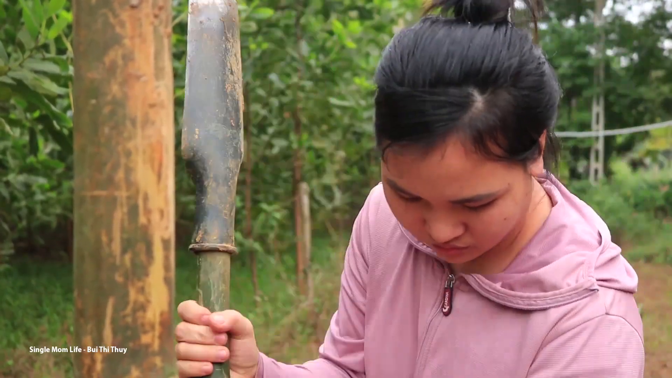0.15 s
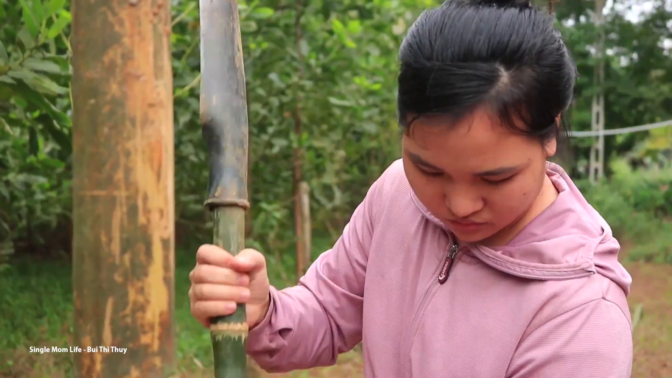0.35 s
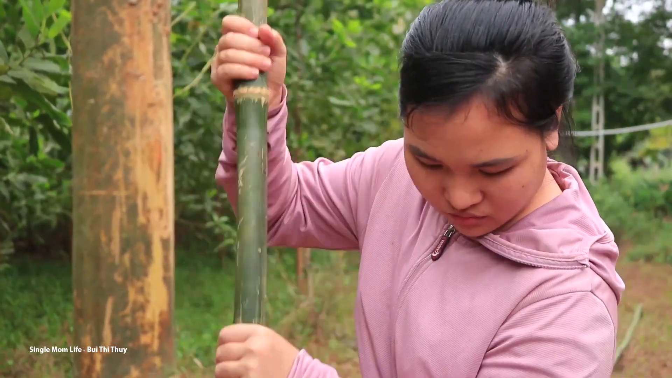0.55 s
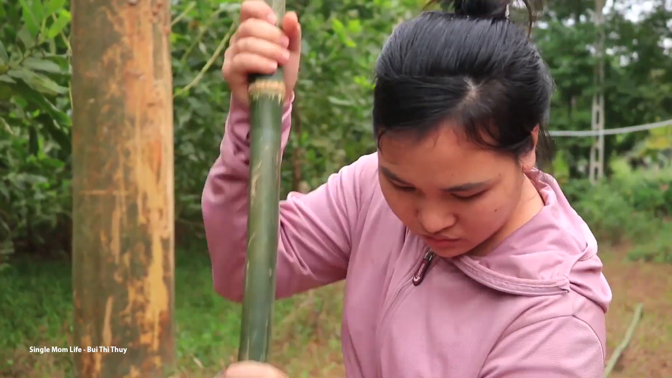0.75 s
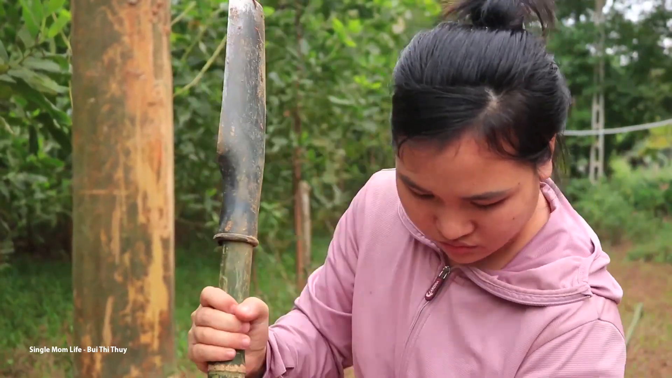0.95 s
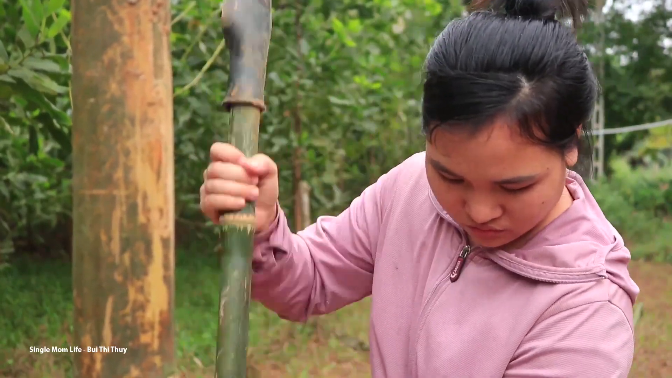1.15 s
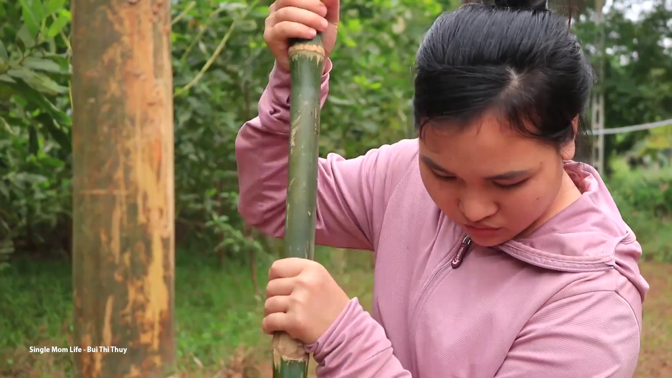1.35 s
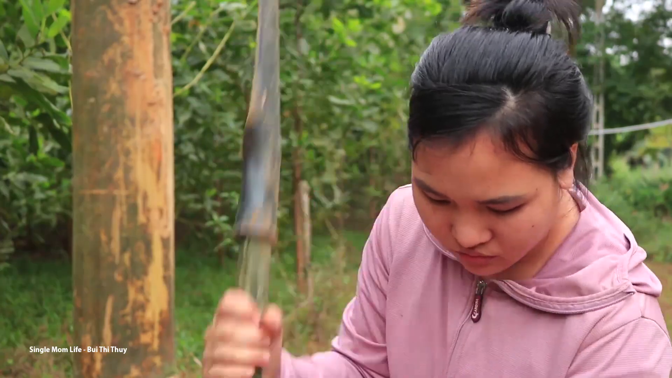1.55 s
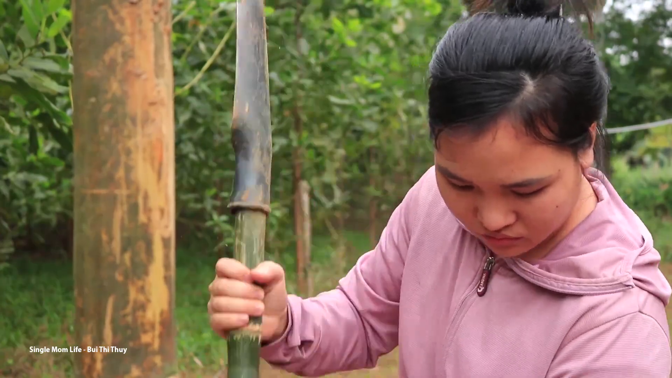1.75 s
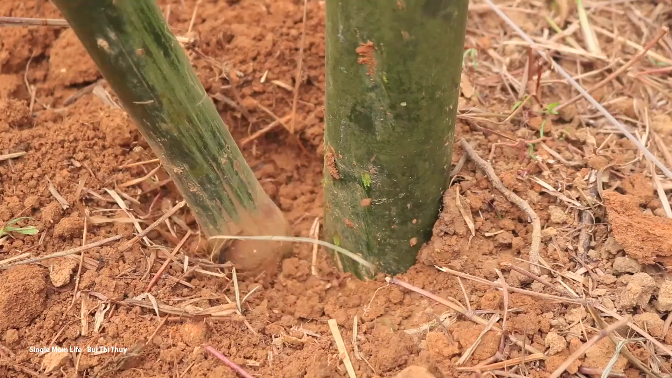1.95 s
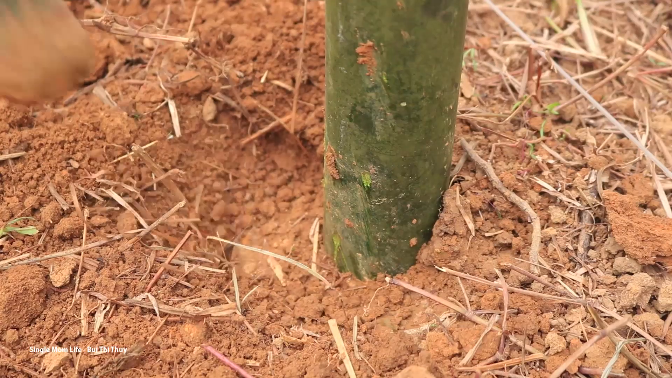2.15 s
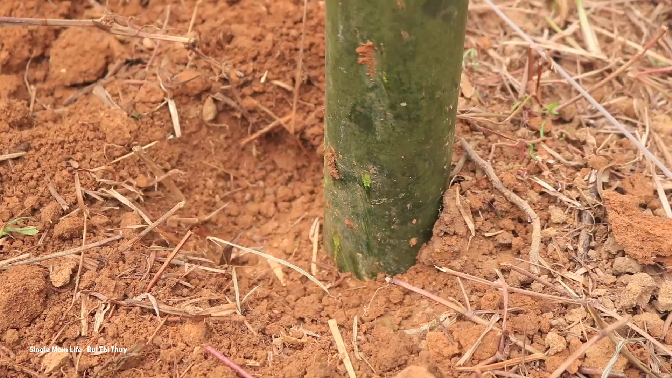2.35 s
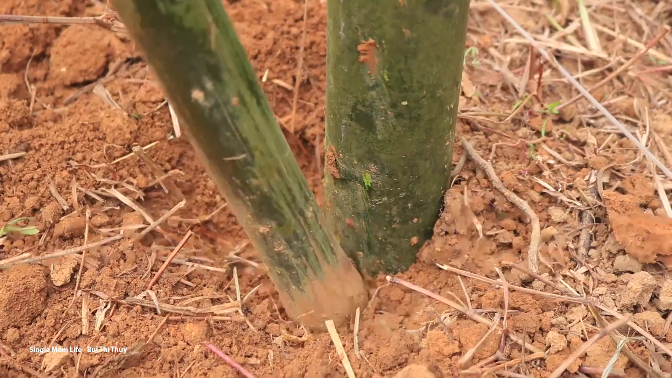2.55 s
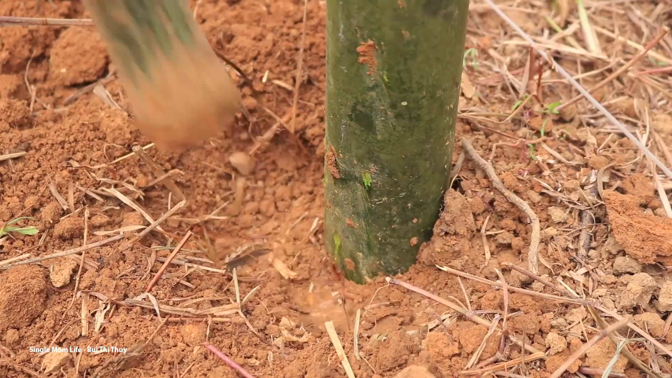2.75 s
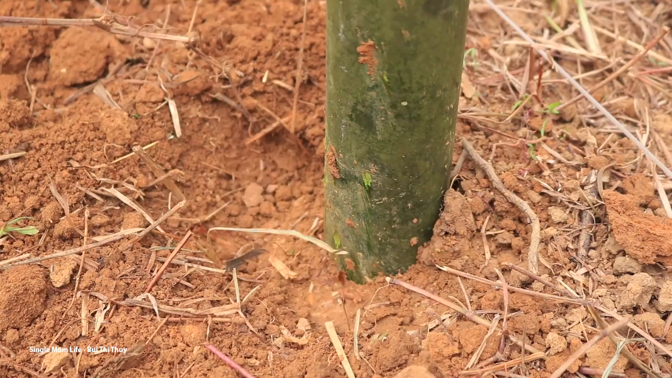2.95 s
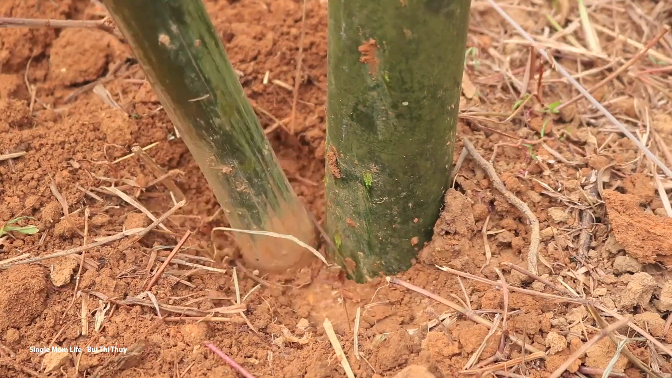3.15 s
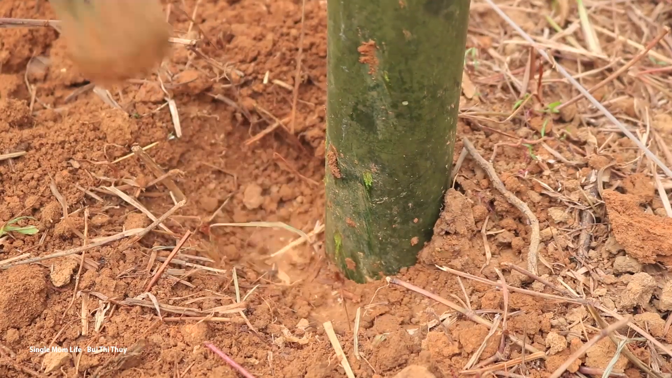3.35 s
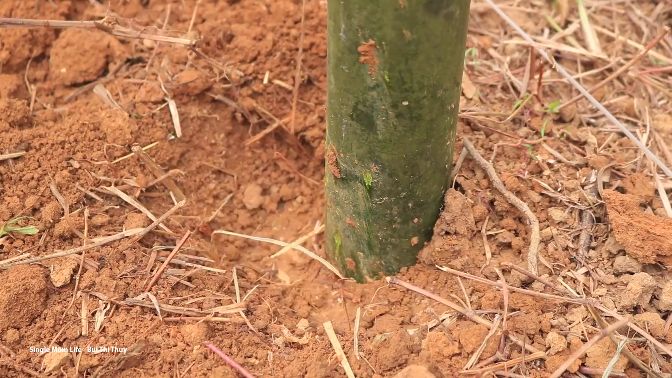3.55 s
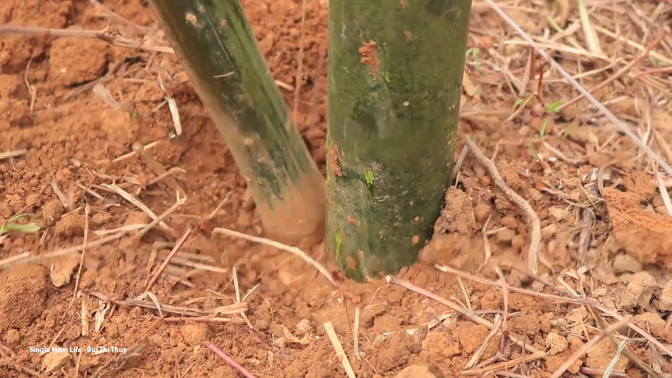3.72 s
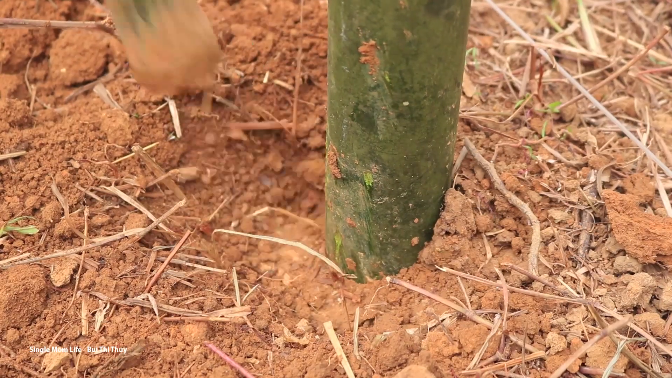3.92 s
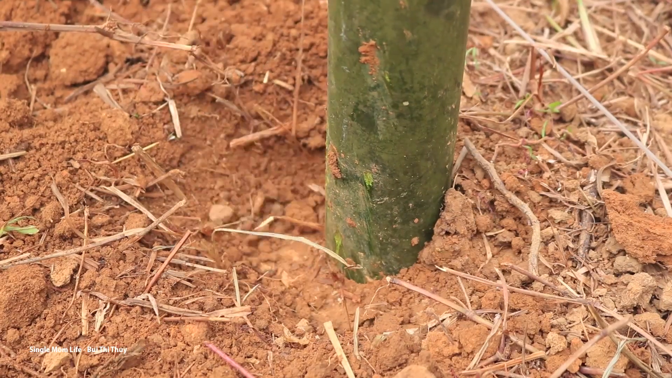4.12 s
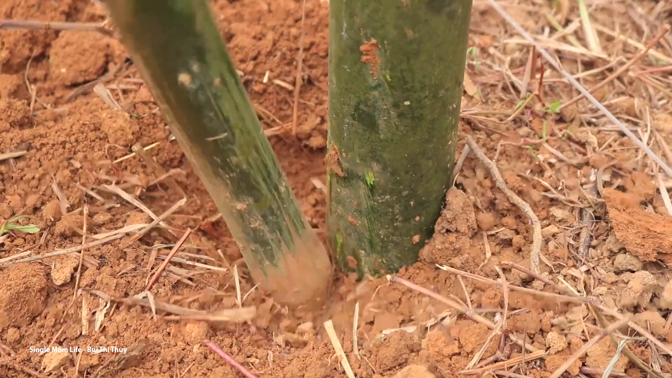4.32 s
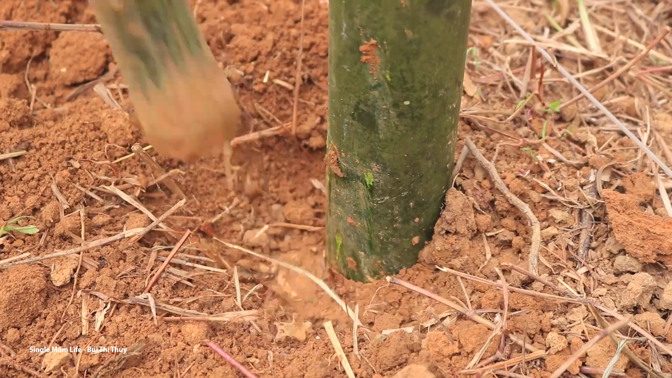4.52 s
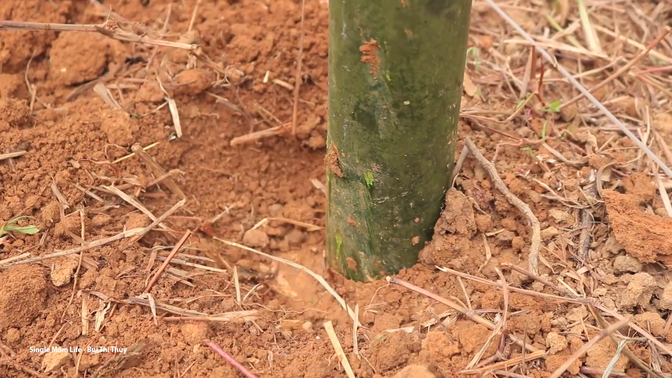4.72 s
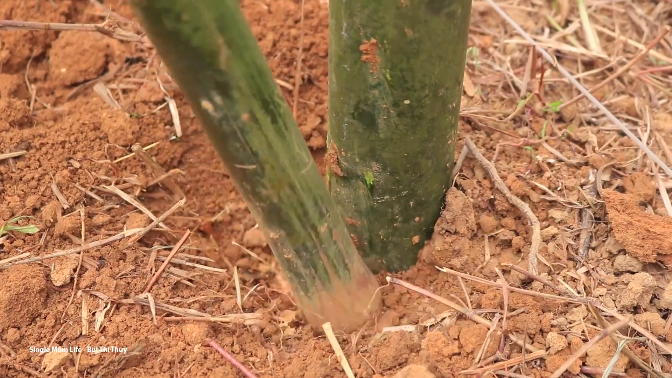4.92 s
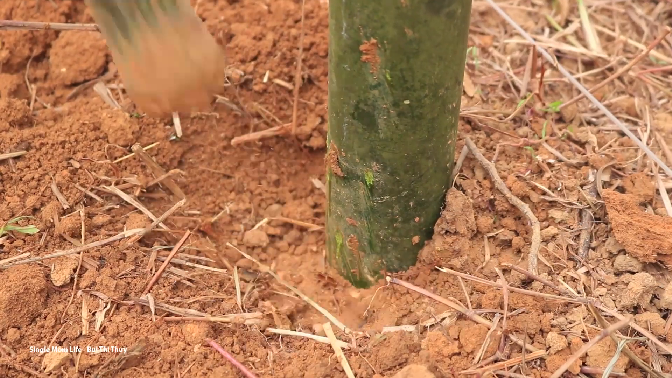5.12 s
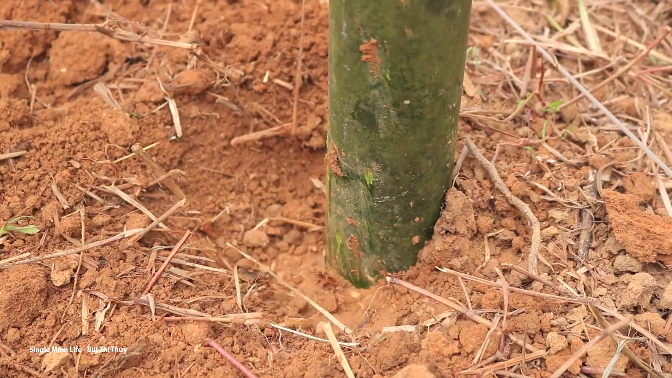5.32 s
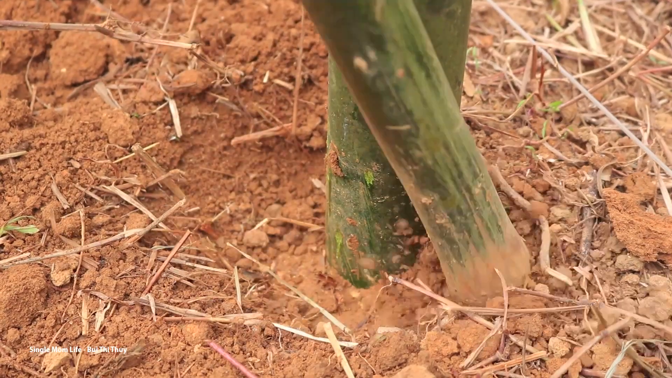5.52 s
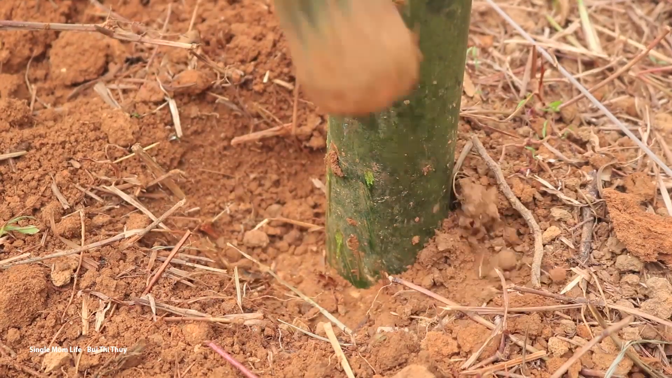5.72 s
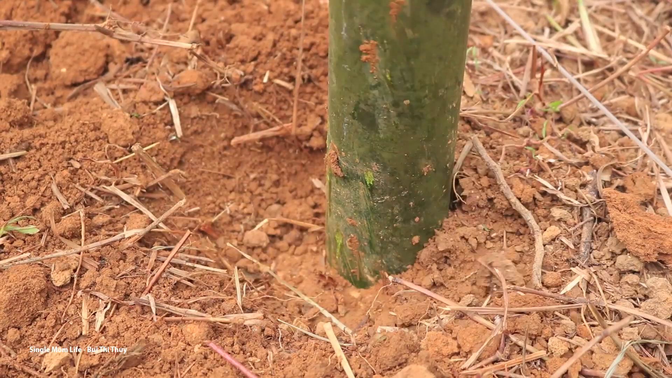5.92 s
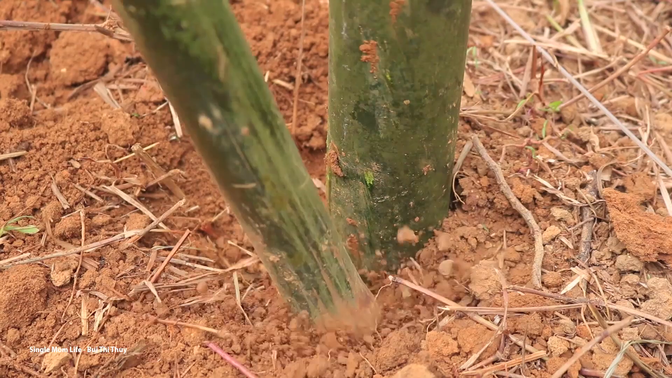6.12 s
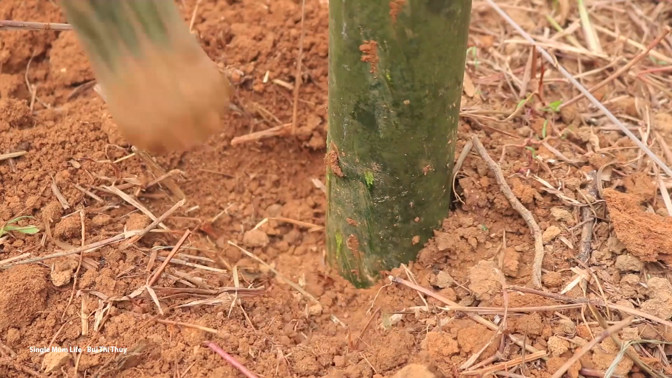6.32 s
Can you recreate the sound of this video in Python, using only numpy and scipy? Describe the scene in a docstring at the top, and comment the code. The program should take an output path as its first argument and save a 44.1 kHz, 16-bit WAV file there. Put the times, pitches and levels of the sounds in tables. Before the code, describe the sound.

Eleven crunchy knocks of a bamboo pole tamping dry earth, roughly every six tenths of a second, with light scuffs between in a quiet orchard.

```python
"""A quiet orchard: soft rustle and thin hiss first, then a green bamboo pole rams soil round a post.
Eleven blows land close to the microphone. In each, the end grazes loose crumbs, then cracks through them;
packed earth stops it with a sinking thump, and the pole judders, sways, buzzes and faintly rings.
Between blows it knocks lightly and scuffs loose soil. The hiss rises just before two seconds and stays.
Noise grains pass through the tube's resonances; the hardest blows overload the recorder."""
import sys
import numpy as np
from scipy import signal
from scipy.fft import rfft, irfft, next_fast_len
from scipy.io import wavfile

SR = 44100
rng = np.random.default_rng(int(sys.argv[2]) if len(sys.argv) > 2 else 0)


def log_audio(samples):
    """Write samples as a 16-bit WAV file to the path given in sys.argv[1]."""
    # one column per channel
    frames = np.atleast_2d(samples).T
    # limit to full scale, then quantise
    limited = np.clip(frames, -1, 1)
    pcm = np.round(limited * 32767).astype(np.int16)
    wavfile.write(sys.argv[1], SR, pcm)


N = 280917  # length in samples
AGE = np.arange(SR // 4) / SR  # seconds since a contact began
RING_AGE = np.arange(SR) / SR  # seconds, for the longer ringing and echoes

# The pole rams the soil. Each row: start in seconds, crushing time in seconds, delay until packed earth
# stops it in seconds, favoured pitch in Hz, then relative levels of crack, grit, graze and thump in dB,
# wall resonance in Hz, relative wall ring in dB.
BLOWS = [(0.241, 0.0079, 0.0094, 1320, -14.5, -25.5, -76, -12.5, 2800, -31),
         (0.946, 0.0023, .004, 2230, -25.5, -35, -55, -18.5, 2060, -44),
         (1.657, 0.0041, .013, 970, -13, -29, -57, -16, 2300, -39.5),
         (1.988, 0.0022, 0.0054, 2180, -24.5, -24.5, -27.5, -7.5, 2000, -42),
         (2.621, 0.0058, 0.00043, 1950, -17.5, -23, -46, -2.5, 2080, -32),
         (3.2041, 0.0021, 0.0015, 456, -14.5, -24, -36, -3.5, 1950, -35),
         (3.79, 0.0073, 0.0061, 1360, -16, -22, -25, -3.5, 2550, -34.5),
         (4.373, .015, .0124, 724, -15.5, -23.5, -33, -3.5, 616, -30),
         (4.971, 0.0079, 0, 464, -18, -33, -12, -4, 2710, -30),
         (5.573, 0.0041, 0.0004, 1420, -17.5, -24.5, -21.5, -6.5, 2060, -38),
         (6.172, 0.003, 0, 3070, -24, -12.5, -17, -10.5, 2150, -37)]
# Broad resonances of the hollow pole. Each row: pitch in Hz, width in Hz, lift in dB.
HOLLOW = [(257, 83, 11.5), (491, 310, 10), (796, 13, 4.5), (992, 170, 5.5), (1321, 110, 5.5), (1580, 27, 8),
          (1876, 80, 7.5), (2134, 64, 5.5), (2860, 220, 3.5), (3320, 270, 1.5), (5400, 890, 0),
          (8200, 4500, 3)]
# Bending modes of the whole pole. Each row: pitch in Hz, relative level in dB, t60 in seconds.
BENDING = [(69.1, -4, 0.79), (141.3, -17, 0.97), (177.7, 9.5, 0.1), (205, -7.5, 0.42)]
# Long-ringing modes of the pole's wall. Each row: pitch in Hz, relative level in dB, t60 in seconds.
WALL = [(702, -15.5, 1), (875, -25, 0.21), (1275, -10, 0.96), (1580, -28, 0.28), (2216, -5.5, 0.38),
        (2335, -0.5, 0.16), (2697, -11, 0.37), (3120, -5, 0.14), (3400, -1, .22)]
# Light knocks of the pole. Each row: start in seconds, favoured pitch in Hz, relative level in dB.
KNOCKS = [(0.380, 733, -43.5), (1.794, 896, -41.5), (1.951, 420, -51.5), (2.027, 315, -31.5),
          (2.936, 362, -57.5), (3.893, 889, -30.5), (5.061, 517, -42), (6.206, 341, -37.5)]
# The pole brushes loose soil and straw. Each row: start in seconds, length in seconds,
# favoured pitch in Hz, relative level in dB, relative grit level in dB.
SCUFFS = [(0.549, 0.083, 1190, -55, -62), (1.934, 0.034, 2770, -57.5, -53), (2.218, .004, 1630, -52, -45),
          (2.316, 0.028, 3330, -56.5, -66), (2.579, 0.019, 2150, -47.5, -46),
          (3.679, .012, 2660, -53.5, -74), (4.579, 0.015, 1620, -52.5, -58),
          (5.005, 0.003, 2700, -39, -28.5), (5.223, 0.0083, 2150, -59.5, -58),
          (5.533, 0.013, 3630, -36.5, -25.5), (5.553, 0.0033, 3020, -28.5, -16),
          (5.673, 0.025, 2470, -55, -55), (5.74, 0.015, 3470, -46.5, -33), (6.251, 0.0034, 2230, -54, -49),
          (6.279, 0.013, 1580, -51.5, -66)]
# Borders of the four bands of a contact, body, wood, crack and grit, in Hz.
BAND_EDGES_HZ = [230, 700, 1500, 4000, 15500]
# Spectrum of the orchard's still air. Each row: frequency in Hz, relative level in dB.
AIR = [(18, -54), (30, -11), (64, -3), (121, -2.5), (184, -6), (295, -7.5), (328, -9), (404, -9.5),
       (632, -10.5), (1220, -14.5), (1320, -12), (1540, -14), (4530, -20.5), (9710, -26.5), (16000, -37)]
# High hiss of the air. Each row: time in seconds, level in dB.
HISS = [(0, -70), (1.85, -67), (1.95, -59.5), (6.37, -60)]
# Likeness of the air at the two capsules. Each row: frequency in Hz, likeness (below zero counts as none).
AIR_LIKENESS = [(60, 0.89), (180, 0.74), (550, 0.32), (1650, 0.02), (4970, -0.78), (15000, -0.065)]
# Balance of the capsules on the pole. Each row: frequency in Hz, left minus right in dB.
CAPSULE_BALANCE = [(60, -3), (180, -2), (600, -1.5), (1400, -0.5), (2600, -2.5), (5500, -1.5), (11000, 1.3)]

# Balance of each kind of contact: body, wood and crack in dB.
BLOW_COLOUR_DB, KNOCK_COLOUR_DB, SCUFF_COLOUR_DB = [1, -4, 0], [0, -3, -6.5], [1.5, -4, -3.5]
FAVOUR_DB, FAVOUR_OCTAVES = 11, 0.73  # lift of a contact round its favoured pitch, and its reach
LIFT_AFTER_S, LIFT_S = 0.183, 0.021  # the pole is pulled free this long after a blow, for this long
AIR_DB = -48.5  # rms level of the rustle
CUTOFF_HZ = 15800


def blows(release_s=0.0051, graze_s=0.0034, level_db=-1.5, width_hz=110, lift_db=3,
          wall_width_hz=520, wall_lift_db=5):
    """The end grazes the loose top, then crushes it for a few milliseconds; the struck wall colours the crack."""
    out = np.zeros(N)
    graze_force = AGE / graze_s * (AGE < graze_s)
    graze_colour_db = np.array([-9, -2.5, 3, -2])
    for s, crush_s, _, hz, blow_db, grit_db, graze_db, _, wall_hz, _ in BLOWS:
        force = np.exp(-np.maximum(AGE - crush_s, 0) / release_s)
        colour_db = colour(BLOW_COLOUR_DB, hz, blow_db, grit_db)
        favoured = [(hz, width_hz, lift_db), (wall_hz, wall_width_hz, wall_lift_db)]
        crack = crunch(force, colour_db, grain_db=3.5, favoured=favoured, click=0.29)
        graze = crunch(graze_force, graze_db + graze_colour_db, grain_db=12.0)
        add(out, s, from_db(level_db) * crack)
        add(out, s - graze_s, graze)
    return out


def crunch(force, levels_db, grain_db, favoured=(), click=0, dull_hz=5000):
    """Crumbs break under a force and sound through the tube; each point of contact favours its own resonance."""
    # a few grains burst far above the rest
    burst_db = grain_db * np.minimum(rng.exponential(1, len(AGE)), 6)
    grains = rms_one(rng.standard_normal(len(AGE)) * from_db(burst_db))
    push = grains * force
    push[0] += click * np.sqrt(np.sum(force ** 2))  # the hard first touch
    dulled = signal.lfilter(*signal.butter(1, dull_hz, fs=SR), push + 1e-18)
    tube = hollow(dulled, [*HOLLOW, *favoured])
    contact = np.zeros(len(AGE))
    bands = zip(levels_db, BAND_EDGES_HZ, BAND_EDGES_HZ[1:])
    for k, (db, low_hz, high_hz) in enumerate(bands):
        part = from_db(db) * rms_one(band(tube, low_hz, high_hz))
        contact += part * (-1) ** k  # neighbouring bands have opposite polarity
    return contact * np.sqrt(np.mean(force ** 2))


def hollow(x, resonances):
    """The tube lifts whatever excites it at its resonances."""
    for hz, width_hz, lift_db in resonances:
        peak = signal.lfilter(*signal.iirpeak(hz, hz / width_hz, fs=SR), x)
        x = x + (from_db(lift_db) - 1) * peak
    return x


def colour(balance_db, hz, level_db, grit_db):
    """Levels of body, wood, crack and grit: the place of contact lifts the bands near its favoured pitch."""
    centres_hz = np.sqrt(np.multiply(BAND_EDGES_HZ[:-2], BAND_EDGES_HZ[1:-1]))
    nearness = np.exp(-(np.log2(centres_hz / hz) / FAVOUR_OCTAVES) ** 2 / 2)
    return [*(level_db + np.array(balance_db) + FAVOUR_DB * nearness), grit_db]


def aftermath(low_cut_hz=32, usual_crush_s=0.007, judder_db=-10.0, judder_follows=1.65,
              sway_db=-21.0, sway_follows=0.97, buzz_db=-39, buzz_follows=0.32):
    """A heavier thump brings more judder and sway; a longer crush feeds the fibres' buzz; the wall rings on."""
    out = np.zeros(N)
    for s, crush_s, stop_s, *_, thump_db, wall_hz, ring_db in BLOWS:
        push_db = 20 * np.log10(crush_s / usual_crush_s)
        stopped = s + stop_s
        sway = ringing(BENDING, scatter_db=3.0) + ground_rumble()
        # each "follows" is in dB per dB of thump or push
        add(out, stopped, from_db(thump_db) * thump())
        add(out, stopped, from_db(judder_db + judder_follows * thump_db) * judder())
        add(out, stopped, from_db(sway_db + sway_follows * thump_db) * sway)
        add(out, stopped, from_db(buzz_db + buzz_follows * push_db) * buzz())
        add(out, stopped, from_db(ring_db) * wall_ring(wall_hz))
    return signal.sosfilt(signal.butter(2, low_cut_hz, "high", fs=SR, output="sos"), out)


def thump(start_hz=265, end_hz=68, glide_s=0.0035, swell_s=0.0066):
    """The earth gives way: a heavy pulse whose pitch sinks as more soil moves with the pole."""
    hz = end_hz + (start_hz - end_hz) * np.exp(-AGE / glide_s)
    pulse = AGE / swell_s * np.exp(1 - AGE / swell_s)
    return np.sin(2 * np.pi * np.cumsum(hz) / SR) * pulse


def judder(onset_s=0.019, fade_s=0.027, slip_db=5):
    """The flexing pole slips against the soil once in each swing, ever more weakly."""
    swing_hz = BENDING[0][0]
    swing = np.cos(2 * np.pi * (swing_hz * AGE + rng.normal(0.45, 0.36)))
    fade = np.exp(-(np.maximum(AGE - onset_s, 0) / fade_s) ** 1.46)
    force = np.minimum(AGE / onset_s, 1) * fade * from_db(slip_db * (swing - 1) / 2)
    rumble = force * rms_one(band(rng.standard_normal(len(AGE)), 188, 289))
    return rumble + crunch(force, [-3, -13.5, -11.5, -23.5], grain_db=5.0, favoured=[(769, 10.4, 9.3)])


def ringing(modes, scatter_db):
    """One stroke on a set of decaying modes, each excited a little differently."""
    out = np.zeros(SR)
    for hz, db, t60 in modes:
        mode_db = db + rng.normal(0, scatter_db) - 60 * RING_AGE / t60
        out += from_db(mode_db) * np.sin(2 * np.pi * hz * RING_AGE)
    return out


def ground_rumble(level_db=-11, t60=0.54):
    """The shaken ground mutters on beneath the pole's sway."""
    mutter = rms_one(band(rng.standard_normal(SR), 66, 188))
    return from_db(level_db - 60 * RING_AGE / t60) * mutter


def buzz(fade_s=0.029):
    """Split fibres of the cane buzz briefly after the shock."""
    force = np.exp(-AGE / fade_s)
    return crunch(force, [3.0, -1.0, 4.0, -0.5], grain_db=-5.5, favoured=[(2850, 610, 1.9)])


def wall_ring(centre_hz, reach_octaves=0.22, damped_db=-12, level_db=4):
    """The grip damps the wall's modes, except those near one pitch."""
    modes = []
    for hz, db, t60 in WALL:
        free = np.exp(-(np.log2(hz / centre_hz) / reach_octaves) ** 2 / 2)
        modes.append((hz, level_db + db + damped_db * (1 - free), t60))
    return ringing(modes, scatter_db=5.5)


def knocks(contact_s=0.0096, level_db=5, width_hz=40, lift_db=8, usual_db=-38,
           brightening=0.24, grit_db=-57, grit_follows=0.58):
    """Light taps that let the tube ring for a moment; the harder the tap, the brighter."""
    out = np.zeros(N)
    force = np.exp(-AGE / contact_s)
    for s, hz, knock_db in KNOCKS:
        harder_db = knock_db - usual_db
        # wood and then crack gain more than body
        balance_db = KNOCK_COLOUR_DB + brightening * harder_db * np.arange(len(KNOCK_COLOUR_DB))
        colour_db = colour(balance_db, hz, knock_db, grit_db + grit_follows * harder_db)
        tap = crunch(force, colour_db, grain_db=2.0, favoured=[(hz, width_hz, lift_db)], click=0.72)
        add(out, s, from_db(level_db) * tap)
    return out


def scuffs(pull_hz=1560, pull_db=-57, pull_grit_db=-51, pull_follows=0.64):
    """Stray scuffs, and one whenever the pole is pulled free: louder the heavier the thump before it."""
    out = np.zeros(N)
    for s, *contact in SCUFFS:
        add(out, s, scuff(*contact))
    for s, *_, thump_db, _, _ in BLOWS:
        pull = scuff(LIFT_S, pull_hz, pull_db, pull_grit_db)
        add(out, s + LIFT_AFTER_S, from_db(pull_follows * thump_db) * pull)
    return out


def scuff(length_s, hz, level_db, grit_db, settle_share=0.48, width_hz=90, lift_db=7):
    """Crumbs and dry straw are brushed aside in coarse grains; a long scuff settles slowly, a short one snaps."""
    settle = np.exp(-np.maximum(AGE - length_s, 0) / (settle_share * length_s))
    force = np.minimum(3 * AGE / length_s, 1) * settle
    colour_db = colour(SCUFF_COLOUR_DB, hz, level_db, grit_db)
    return crunch(force, colour_db, grain_db=4.5, favoured=[(hz, width_hz, lift_db)], dull_hz=6940)


def microphones(x, lead_s=0.000025, spread_db=-7, flicker_hz=220):
    """Sound reaches the left capsule first; crumbs break all round the pole, so the treble's direction flickers."""
    size = next_fast_len(N + SR // 10)
    hz = np.fft.rfftfreq(size, 1 / SR)
    half = np.array([[0.5], [-0.5]])  # left and right share each difference equally
    direction = rms_one(band(rng.standard_normal(N), 21.0, flicker_hz))
    side = from_db(spread_db) * direction * band(x, 940, 14300)
    pair = rfft(x + np.sign(half) * side, size)
    timed = pair * np.exp(2j * np.pi * hz * lead_s * half)
    return irfft(timed * from_db(half * at_hz(CAPSULE_BALANCE, hz)), size)[:, :N]


def orchard(x, near_db=-19, near_t60=0.12, far_db=-33, far_t60=0.58):
    """Ground and trunks scatter a short tail; the trees farther off return a faint dull one."""
    onset = 1 - np.exp(-RING_AGE / 0.009)
    near, far = rng.standard_normal((2, 2, SR)) * onset
    near = rms_one(band(near, 240, 6800) * from_db(-60 * RING_AGE / near_t60))
    far = rms_one(band(far, 200, 3400) * from_db(-60 * RING_AGE / far_t60))
    echoes = (from_db(near_db) * near + from_db(far_db) * far) / np.sqrt(SR)
    return signal.fftconvolve(x[None], echoes, axes=1)[:, :N] / 2  # both tails at half strength


def air(likeness):
    """Steady soft rustle of far foliage, shaped noise partly shared by both sides, with a thin hiss on top."""
    hz = np.fft.rfftfreq(N, 1 / SR)
    alike = np.clip(at_hz(likeness, hz), 0, 1)
    mid, side = rfft(rng.standard_normal((2, N)))
    pair = np.sqrt(1 + alike) * mid + np.sqrt(1 - alike) * side * [[1], [-1]]
    rustle = irfft(from_db(at_hz(AIR, hz)) * pair, N)
    hiss = rms_one(band(rng.standard_normal((2, N)), 10700, 0.45 * SR))
    hiss_db = np.interp(np.arange(N) / SR, *np.transpose(HISS))
    return from_db(AIR_DB) * rms_one(rustle) + from_db(hiss_db) * hiss


def from_db(db):
    """Decibels to gain."""
    return 10 ** (np.asarray(db) / 20)


def rms_one(x):
    """Scale to unit rms."""
    return x / np.sqrt(np.mean(x ** 2) + 1e-20)


def at_hz(points, hz):
    """Read a spectrum on a log-frequency axis."""
    points_hz, values = np.transpose(points)
    return np.interp(np.log(hz + 1), np.log(points_hz), values)


def add(track, s, sound):
    """Mix a sound into a track at a time in seconds."""
    at = round(s * SR)
    track[at:at + len(sound)] += sound[:N - at]


def band(x, low_hz, high_hz):
    """Causal band-pass."""
    return signal.sosfilt(signal.butter(2, [low_hz, high_hz], "band", fs=SR, output="sos"), x)


def scene():
    """The pole close by, its echoes among the trees and the air."""
    pole = blows() + aftermath() + knocks() + scuffs()
    return microphones(pole) + orchard(pole) + air(AIR_LIKENESS)


def record(dry):
    """The recorder clips the hardest peaks flat, then a steep low-pass cuts the top."""
    clipped = np.clip(dry, -1, 1)
    return signal.sosfilt(signal.ellip(10, 0.1, 70, CUTOFF_HZ, fs=SR, output="sos"), clipped)


dry = scene()
out = record(dry)
log_audio(out)
```